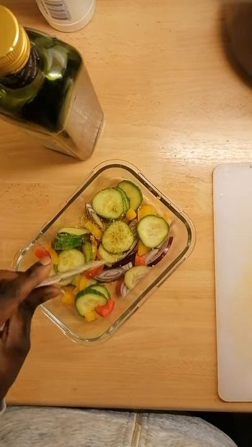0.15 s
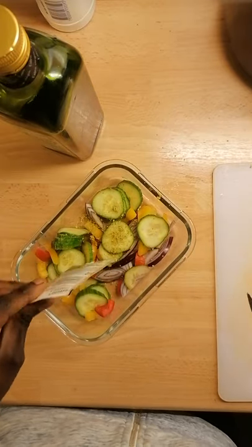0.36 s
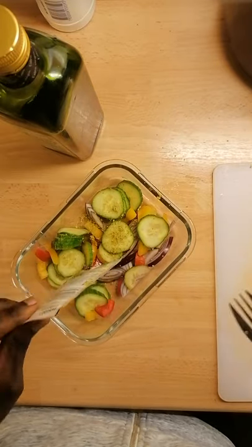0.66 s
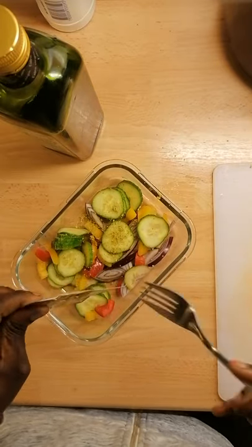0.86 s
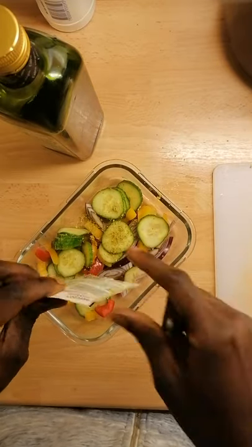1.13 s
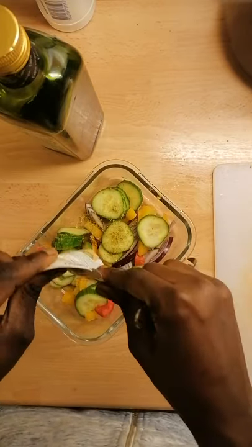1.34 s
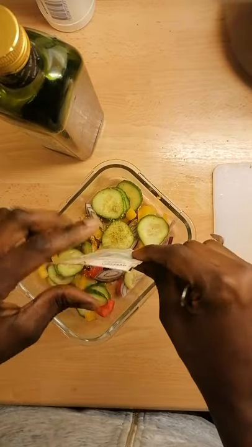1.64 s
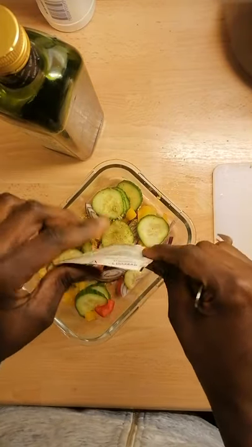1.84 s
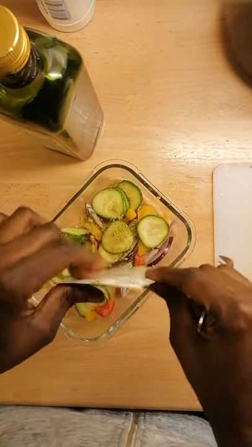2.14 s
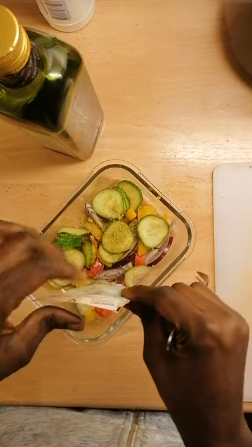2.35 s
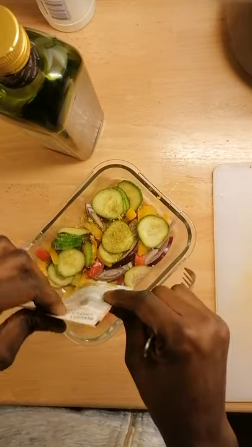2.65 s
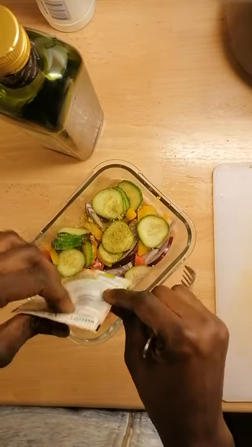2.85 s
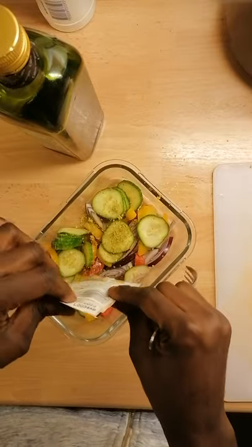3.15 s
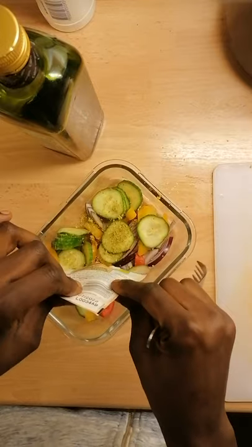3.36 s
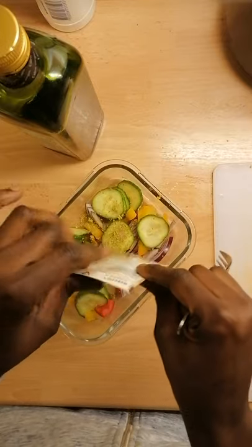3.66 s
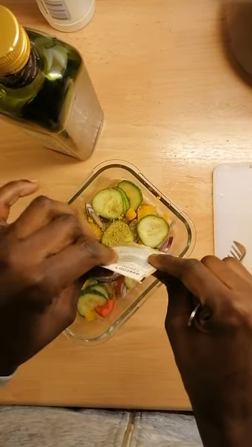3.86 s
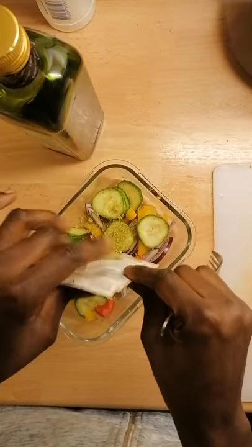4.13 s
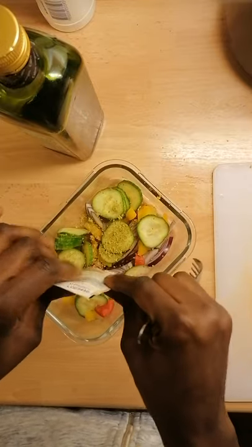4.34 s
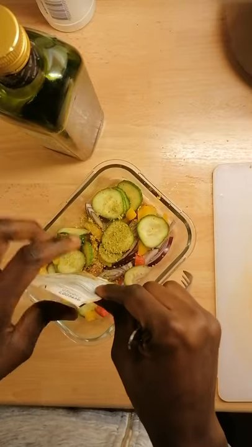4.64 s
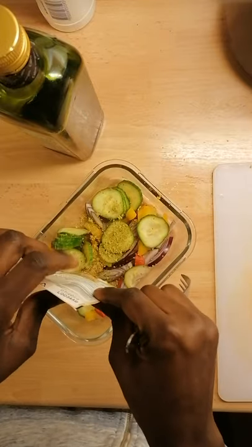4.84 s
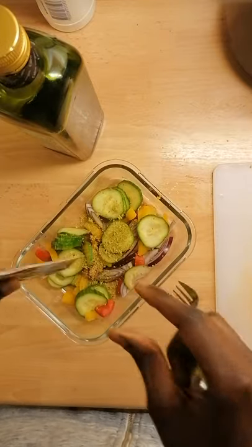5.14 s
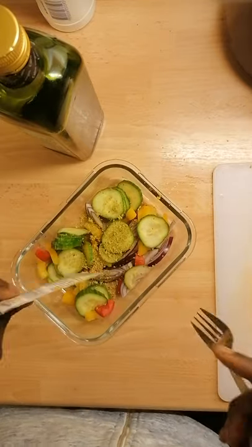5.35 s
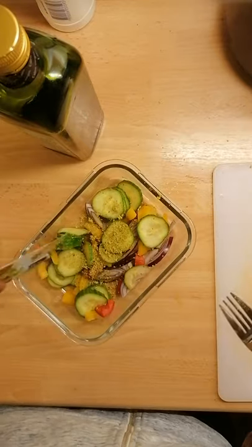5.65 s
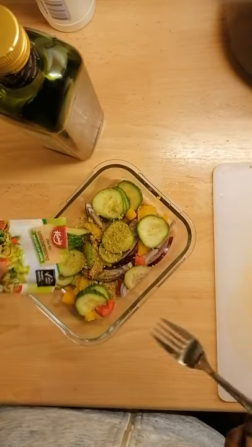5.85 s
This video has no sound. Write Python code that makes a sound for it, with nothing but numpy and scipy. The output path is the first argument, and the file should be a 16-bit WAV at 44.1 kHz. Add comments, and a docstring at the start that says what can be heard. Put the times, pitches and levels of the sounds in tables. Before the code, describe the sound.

A quiet small kitchen, with a low, slowly beating appliance hum near 100 Hz, soft room noise and faint rumble. In the first 0.2 s a paper sachet gives a few dry snaps, then grains shake very softly until about 0.7 s; a barely audible airy whistle passes near 1 s. From 1.3 s crisp paper clicks come in irregular clusters, some with small dull fingertip thuds, over a thin grainy rustle. Around 2.5 s there is a firmer snap, with faint high whistly traces up to 3.1 s. At 3.1 s a fork clinks once, bright and short, and the rustle surges briefly. From 3.4 to 4.8 s taps are stronger, roughly every quarter second, each a papery snap with a low thud, densest and sharpest near 4.8 s. After 5 s only faint, hissy grain shakes remain, at about 5.4, 5.6 and 5.8 s. Close, mono, dulled treble, short room reverberation.

```python
"""A paper sachet is handled over a glass dish in a small kitchen; two hums, room noise and rumble lie beneath.
First the sachet snaps and its grains shake softly (noise bursts through panel resonances) over a rustle
(random ticks), and faint whistles (narrow-band noise) come and go. From 1.3 s snaps crowd in with fingertip
thuds (decaying sines). At 3.1 s a fork clinks once (a sum of decaying modes) and the rustle surges. Taps and
snaps go on to 5 s, then only faint shakes remain. Near sounds also feed a sparse random room tail."""
import sys
import numpy as np
from scipy import signal
from scipy.fft import rfft, irfft, next_fast_len
from scipy.io import wavfile
from scipy.ndimage import uniform_filter1d

SR = 44100
rng = np.random.default_rng(int(sys.argv[2]) if len(sys.argv) > 2 else 0)


def wav_out(sig):
    """Save sig, one row per channel (or a flat mono array), as 16-bit PCM at SR to the path in sys.argv[1]."""
    wavfile.write(sys.argv[1], SR, np.round(np.clip(np.atleast_2d(sig).T, -1, 1) * 32767).astype(np.int16))


N = 264415  # samples, about 6 s

# fingertip taps on the sachet: start_s, level_db (before the onset ramp), pitch_hz
TAPS = [(1.342,-46,121),(1.538,-51,216.4),(1.571,-49,100),(1.795,-46.5,161),(1.859,-52,213),(2.003,-46,171),(2.241,-40,143),(2.47,-42,133),
        (2.944,-39.5,106.6),(3.423,-35.5,156.4),(3.638,-38,124.4),(3.864,-41,111.6),(4.082,-34.5,135),(4.318,-33,164.7),(4.534,-33.5,119.4),(4.778,-38,166)]


def gain_of(db):
    """Amplitude ratio: 20 dB is a factor of ten."""
    return 10 ** (np.asarray(db) / 20)


def evened(x):
    """Power normalisation: scales to rms 1."""
    return x / np.sqrt(np.mean(x ** 2) + 1e-20)


def read(points, hz):
    """Spectral envelope: interpolates a table along log frequency."""
    f, value = np.transpose(points)
    return np.interp(np.log(hz + 1), np.log(f + 1), value)


def add(mix, s, sound):
    """Superposition: sums a sound into the mix at second s."""
    part = mix[max(round(s * SR), 0):][:len(sound)]
    part += sound[:len(part)]


def resonate(x, hz, width):
    """Resonance by heterodyning: shifts hz (number or curve) to zero, low-passes, shifts back; gain 1 at hz."""
    turn = np.exp(2j * np.pi * np.cumsum(hz * np.ones(len(x))) / SR)
    r = np.exp(-np.pi * width / SR)
    return 2 * (turn * signal.lfilter([1 - r], [1, -r], x / turn)).real


def coloured(x, db_of):
    """Zero-phase filtering: weights the spectrum by a gain in dB given as a function of frequency."""
    size = next_fast_len(len(x))
    weight = gain_of(db_of(np.fft.rfftfreq(size, 1 / SR)))
    return irfft(rfft(x, size) * weight, size)[:len(x)]


def handling_db():
    """Excitation envelope: how busily the hands work the sachet, in dB at every sample."""
    # handling effort: time_s, level_db
    handling = [(0,-64),(.2,-67.5),(.65,-72),(1.2,-77.5),(1.57,-64),(2.0,-71),(2.6,-69),(2.8,-75),(3.05,-65.5),(3.209,-46.5),(3.3,-54.5),(3.4,-59.5),(3.5,-68),
                (3.96,-73.5),(4.27,-63.5),(4.55,-70),(4.71,-57.5),(4.93,-61.5),(5.06,-77),(5.5,-68),(6,-75)]
    return np.interp(np.arange(N) / SR, *np.transpose(handling))


def kitchen_air():
    """Shaped noise plus two appliance hums slightly apart, whose interference is heard as beating."""
    # room noise spectrum: frequency_hz, relative_db (per Hz)
    air_colour = [(12, -38.5), (20, 2.5), (53, -6.5), (102, -4.5), (152, -8.5), (329, -19.5), (631, -21.5),
                  (966, -16), (2050, -26), (2260, -21.5), (2500, -29), (6630, -39.5), (7900, -46.5),
                  (10300, -79), (17400, -120)]
    air_db = -72  # rms of the part above 250 Hz
    hums_hz, hums_db, hums_meet_s = (98.87, 100.12), (-68.5, -66.5), .6  # in phase at hums_meet_s
    air = coloured(rng.standard_normal(N), lambda f: read(air_colour, f))
    scale = np.std(coloured(air, lambda f: np.where(f > 250, 0, -100)))
    t = np.arange(N) / SR - hums_meet_s
    hum = sum(gain_of(db) * np.sqrt(2) * np.sin(2 * np.pi * hz * t) for hz, db in zip(hums_hz, hums_db))
    fuzz = gain_of(-75) * evened(resonate(rng.standard_normal(N), 100., 3.6))  # narrow noise around the hums
    return gain_of(air_db) * air / scale + hum + fuzz


def rumble():
    """Resonance driven by noise: low and lumpy around one hollow mode, swelling while the hands work."""
    rumble_db, follows = -72.5, 0.72  # rms at a handling level of -66 dB; dB per dB of handling
    db = rumble_db + follows * (uniform_filter1d(handling_db(), size=SR // 6) + 66)
    hollow = resonate(resonate(rng.standard_normal(N), 185., 74.0), 185., 74.0)
    return gain_of(db) * evened(hollow)


def whistles():
    """Narrow-band noise: a narrow resonance turns noise into faint fuzzy tones that come and go."""
    # thin tones: start_s, end_s, first_hz, last_hz, width_hz (of each of two passes), level_db (before fades)
    whistle_rows = [(0.347, 1.0, 2300, 2300, 120, -87), (0.907, 1.28, 970, 960, 80, -74),
                    (2.25, 2.48, 3020, 2810, 320, -70.5), (2.78, 2.875, 3350, 3350, 200, -79),
                    (2.914, 3.0, 3900, 3830, 200, -67), (3.027, 3.09, 3000, 2980, 150, -68.5)]
    out = np.zeros(N)
    for start, end, first_hz, last_hz, width, db in whistle_rows:
        hz = np.linspace(first_hz, last_hz, round((end - start) * SR))
        tone = resonate(resonate(rng.standard_normal(SR)[:len(hz)], hz, width), hz, width)
        add(out, start, gain_of(db) * evened(tone) * signal.windows.tukey(len(tone), .15))
    return out


def rustle():
    """Shot noise: a dense rain of tiny ticks of uneven size from grains and paper rubbing."""
    # rustle spectrum: frequency_hz, relative_db (per Hz)
    rustle_colour = [(180, -55), (300, -11.5), (416, -4.5), (525, 7.5), (1070, -14), (1500, -4), (5620, 4),
                     (7190, -6.5), (7800, -52.5), (10100, -41), (17200, -120)]
    treble_db, dulling = -5, 0.13  # treble gain at a handling level of -65 dB; dB lost per dB of handling
    ticks = rng.standard_normal(N) * gain_of(3.5 * np.minimum(rng.exponential(1, N), 8))
    clumps = evened(uniform_filter1d(rng.standard_normal(N), size=300))
    ticks = evened(coloured(ticks * gain_of(1.8 * clumps), lambda f: read(rustle_colour, f)))
    low = signal.sosfilt(signal.butter(2, 4000, fs=SR, output="sos"), ticks)
    treble = ticks - low
    effort_db = handling_db()
    return gain_of(effort_db) * (low + gain_of(treble_db - dulling * (effort_db + 65)) * treble)


def fork():
    """Modal decay: a knocked steel fork rings once; each mode wavers in strength at its own random rate."""
    # modes of the clink: frequency_hz, relative_db, t60_s
    modes = [(2223, -2, .3), (3112, -3, .3), (3492, -1, .4), (2557, -9, .3), (4764, -5, .35),
             (5170, -1, .35), (5609, -9, .3), (5776, -6, .25), (6627, -2, .3), (6955, -5, .25),
             (7480, -5, .2)]
    start_s, fork_db = 3.113, -43.0
    out, t = np.zeros(N), np.arange(SR // 2) / SR
    waver_hz = rng.uniform(8, 16, len(modes))
    wavers = 1 + .8 * np.cos(2 * np.pi * waver_hz[:, None] * t)
    ring = np.zeros(len(t))
    for (hz, db, t60), waver in zip(modes, wavers):
        ring += gain_of(db - 60 * t / t60) * np.sin(2 * np.pi * hz * t) * waver
    add(out, start_s, gain_of(fork_db) * ring)
    return out


def thuds():
    """Damped oscillation: a soft fingertip pushes a low dull ring that swells for a few milliseconds."""
    t60_s, onset_s = 0.099, 0.0013
    out, t = np.zeros(N), np.arange(SR // 2) / SR
    swell = 1 - np.exp(-t / onset_s)
    for s, db, hz in TAPS:
        add(out, s, gain_of(db - 60 * t / t60_s) * swell * np.sin(2 * np.pi * hz * t))
    return signal.sosfilt(signal.butter(2, 62, "high", fs=SR, output="sos"), out)


def snap(db, hz, ring_db, knock_db, body_db, treble_db, rise_ms, fade_ms, slips):
    """Source and filter: a run of uneven slips rings the paper panels (heard directly, sent to walls)."""
    # steady panels of the sachet: frequency_hz, width_hz, gain_db
    paper = [(553.5, 30, 7), (1161, 8.2, 8), (1740, 120, -22), (2410, 230, -11), (4030, 28, -28.5)]
    onset_ms, fade_shape = .35, 1.3
    ms = np.arange(len(slips)) * 1000 / SR
    rise_ms, fade_ms = max(rise_ms, .2), max(fade_ms, .5)
    swell = np.minimum(ms / onset_ms, 1) * gain_of(-1.4 * (rise_ms - ms))  # long runs start softly
    fade = np.exp(-(abs(ms - rise_ms) / fade_ms) ** fade_shape)
    burst = slips * np.where(ms < rise_ms, swell, fade)
    # averaged over all directions the chance colour of the slips evens out to that of one click
    click = np.roll(signal.unit_impulse(len(ms)), round((rise_ms + fade_ms / 2) * SR / 1000))
    # frequency_hz, gain_db
    shape = [(150, knock_db - 21.0), (330, knock_db + 9.0), (500, body_db + 4.0), (1050, body_db + 10.0),
             (1450, -0.39), (4000, -0.31), (5200, treble_db + 8.0), (8000, treble_db - 5.5)]
    out = []
    # the loudest panel beams at the microphone more than at the walls
    for push, reach_db in ((burst, 3.0), (click, -4.0)):
        # shifted by 200 samples while the zero-phase filter works
        wide = np.roll(coloured(np.roll(push, 200), lambda f: read(shape, f)), -200)
        panels = sum(gain_of(d) * resonate(wide, f, w) for f, w, d in paper)
        loudest = resonate(resonate(push, hz, 700.), hz, 700.)
        sound = wide + panels + gain_of(ring_db + reach_db) * loudest
        out.append(gain_of(db) * sound / np.sqrt(np.sum(sound ** 2) / 600))  # equal energy for equal db
    return out


def snaps_and_shakes():
    """Impulsive excitation: snaps of the sachet and soft shakes of its grains, as (direct, sent to the walls)."""
    # snaps and soft shakes: start_s, level_db, pitch_hz (loudest panel); then relative ring_db (that panel),
    # body_db (450-1200 Hz), treble_db (over 4.5 kHz); rise_ms, fade_ms
    snap_rows = [(0.0482,-44.5,2200,-31,-5,-22,2.4,7),(0.1109,-46,1710,3,-11.5,-23,2.71,5.2),(0.1403,-36,1700,-2,-18.5,-3.5,1.09,5.9),(.411,-56.5,3350,2,-13,-3.5,9.2,27),
                 (.4535,-59.5,3550,11,-20,2.5,3.4,6.7),(0.635,-56,5300,-6,-17,0.5,1.2,31),(.697,-64.5,2240,-21,-23,-3,0.37,9),(1.3128,-58.5,3080,-5,-2.5,-9,3.4,6),
                 (1.3332,-40,2480,-18,-11.5,-9,5,4.7),(1.3648,-37.5,3920,-8,-7.5,-6.5,1.02,5.6),(1.4249,-37.5,2230,-0.5,-17,-7.5,4.8,2.78),(1.5908,-52,1200,-6,13,-20,2.7,4.4),
                 (1.617,-33.5,3780,-5,-19.5,-10.5,8.4,4.5),(1.705,-51,3980,-7,-4.5,-7.5,1.5,3.4),(1.791,-40.5,1430,-0.5,-4,-10,9.4,5.4),(1.92,-61,3900,1,-9,-3,1.4,6),
                 (2.001,-54,3440,4,-8,-6,1,6.9),(2.0111,-50.5,1660,3,-6.5,-9,1.2,12),(2.1369,-56,3370,2,-13,1,1.6,3),(2.1557,-54,1280,-8,0,-12,1.2,7.7),
                 (2.242,-50.5,1750,-8,-5.5,-8,6.8,7.4),(2.2698,-60.5,1600,-7,0,-11,0.32,9),(2.468,-53,1530,-6,-11,-16,2.2,24),
                 (2.4733,-42,1570,10.5,2.5,-5,1.36,6.4),(2.492,-34.5,1630,8,-6,-6,12,0.91),(2.5192,-53.5,1730,-4,1.5,-7,0.73,6.5),
                 (2.6414,-46,1620,3.5,-6,-14.5,1.7,9),(2.681,-43,1630,7,-7.5,-8,6,2.2),(2.7171,-46.5,2510,-9.5,-0.5,-7.5,5.3,18),(2.8835,-56,2480,-8,-3,-10,.6,5.5),
                 (2.9179,-48,1660,11,-4.5,-12,2.2,2.1),(2.9436,-42,1480,4,-7,-8.5,2.1,19),(3.079,-40.5,1650,-2.5,-12,-16.5,2.1,4.8),(3.089,-38.5,2720,0,-6.5,-7.5,1.78,6.6),
                 (3.1124,-33,3440,18,5.5,11,2.4,10.3),(3.204,-45,2380,12,-11,-24,9.7,13),(3.2297,-45.5,1740,0,8,-7,1.5,6.7),(3.29,-51,2430,2.5,-14,-12,2,6),
                 (3.3051,-42.5,1920,-1,-6,-7.5,2,6.4),(3.418,-33,2200,-2.5,-2.5,-8.5,6.9,7.1),(3.5385,-50,1530,1.5,-14,-8.5,2.4,7.4),(3.636,-35.5,1540,5,-8,-7.5,8.4,7.8),
                 (3.6683,-35,1510,-17,-12,-9.5,3.6,3.8),(3.861,-38,3360,-11,-10,-13.5,3.1,3.5),(3.9847,-55.5,1340,6,-12,-9,0.62,7),(4.0865,-37,3920,-6,-5.5,-8.5,3.1,8),
                 (4.1004,-45,2470,-2,-3,-15,.6,8),(4.229,-52,1620,5.5,4,-8,6.7,6),(4.3134,-37.5,1580,3,-7,-9.5,.6,15),(4.3221,-37,4200,-12,-2.5,-6,5.1,5),
                 (4.5319,-31.5,1600,-5.5,-11,-8,8.1,5),(4.557,-36,2340,0,-27,-9,.6,4.5),(4.6225,-41,1610,3,2.5,-19,2.33,6.4),(4.671,-41.5,2500,-5.5,-14,-11.5,3.5,5.4),
                 (4.6998,-48,1420,-2,8,-7,1.07,12),(4.745,-51,2490,-12,-3,-31,0.32,3.7),(4.767,-41,1580,-5,-12.5,-6.5,4.3,21),(4.778,-29,4400,-1,-14,-5,1.3,4.8),
                 (4.815,-33.5,2650,-1,-19.5,-3.5,1.12,2.68),(4.8539,-33.5,3840,4.5,-10.5,-3.5,2.8,5.8),(4.9191,-50,2520,9,4,-4,5,9.6),(4.965,-51,2410,-5,-10,-1,4.8,20),
                 (5.0121,-43.5,2420,7,-16.5,-11.5,2.1,4.2),(5.342,-61,5650,7,-1,6,0.82,54),(5.394,-57,5400,-4,-25,0.5,2.1,10.6),(5.446,-59.5,3110,-3,-14,-4,6.3,3.3),
                 (5.5683,-54.5,5750,5,-19,-2,2.3,30),(5.609,-52,3020,0,-20,1,7.5,8),(5.629,-53.5,5700,-1,-21,-3,4,13),(5.768,-54.5,5150,-8,-22,-6.5,10,18),
                 (5.812,-50,3360,-9,-17,-4,4.3,21)]
    tap_reach_s = .02  # a snap this close to a tap is under the fingertip
    # relative 230-450 Hz knock, alone or under a fingertip; dB per dB of body
    free_knock_db, tapped_knock_db, knock_follows = -16, -2.5, 0.77
    direct, spread = np.zeros((2, N))
    slips = np.tanh(0.13 * rng.standard_normal((len(snap_rows), 3000)))
    for (s, db, hz, ring_db, body_db, *row), slip in zip(snap_rows, slips):
        tapped = any(abs(s - tap[0]) < tap_reach_s for tap in TAPS)
        knock_db = (tapped_knock_db if tapped else free_knock_db) + knock_follows * body_db
        near, far = snap(db, hz, ring_db, knock_db, body_db, *row, slip)
        add(direct, s, near)
        add(spread, s, far)
    return direct, spread


def room(x):
    """Reverberation: three sparse random tails taken in turn, each band dying at its own speed."""
    # reverberation time: frequency_hz, t60_s
    decay = [(100, 0.35), (260, 0.37), (700, 0.49), (1840, 0.33), (4850, 0.36)]
    out, t = np.zeros(N), np.arange(N) / SR
    for k in range(3):
        taps = np.zeros(SR // 2)
        at = np.arange(100, len(taps) - 10, 10)
        taps[at + rng.integers(0, 10, len(at))] = rng.choice([-1., 1.], len(at))  # one echo per 10 samples
        hz, s, z = signal.stft(taps, SR, nperseg=256)
        t60 = np.maximum(read(decay, hz), .05)[:, None]
        tail = signal.istft(z * gain_of(-60 * s / t60), SR, nperseg=256)[1]
        turn = np.sqrt(2 / 3) * np.cos(np.pi * (t * 3.7 + k / 3))  # the three squared weights sum to 1
        out += signal.fftconvolve(x * turn, tail / np.linalg.norm(tail))[:N]
    return out


def scene():
    """Superposition: near sounds, their room tail and the background."""
    snaps, spread = snaps_and_shakes()
    near = fork() + rustle()
    low = thuds()
    walls = room(spread + 0.47 * snaps + near + 1.5 * low)  # shares that reach the walls
    return (snaps + near + low + gain_of(-5.0) * walls + whistles() + rumble() + kitchen_air())[None]


def record(dry):
    """Transducer response: a small microphone with a few dips, a band limit and a trace of converter hiss."""
    # microphone response: frequency_hz, gain_db
    response = [(20, -4.5), (200, -1.5), (255, -4), (330, 0.5), (1130, -3.5), (1270, -9.5), (1420, 0),
                (4000, -0.5), (4400, -5.5), (5000, -5), (6800, 1), (7500, -0.5)]
    edge_hz = 7540
    heard = coloured(dry[0], lambda f: read(response, f))[None]
    band_limit = signal.firwin(221, edge_hz, window=("kaiser", 4.5), fs=SR)
    narrow = signal.oaconvolve(heard, band_limit[None], "same")
    narrow = signal.sosfilt(signal.butter(6, 8400, fs=SR, output="sos"), narrow)
    hiss = gain_of(-98.0) * rng.standard_normal(dry.shape)
    return narrow + signal.oaconvolve(hiss, signal.firwin(255, 15800, fs=SR)[None], "same")


dry = scene()
out = record(dry)
wav_out(out)
```